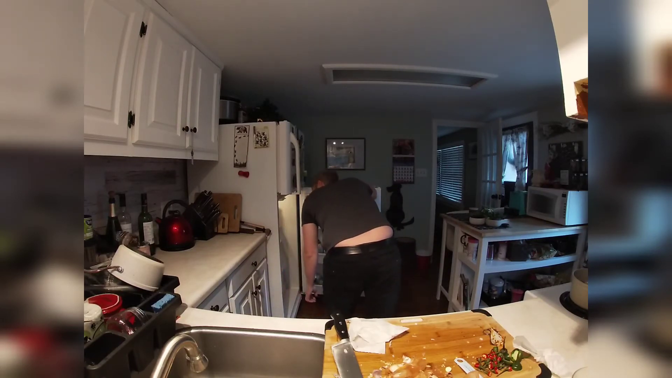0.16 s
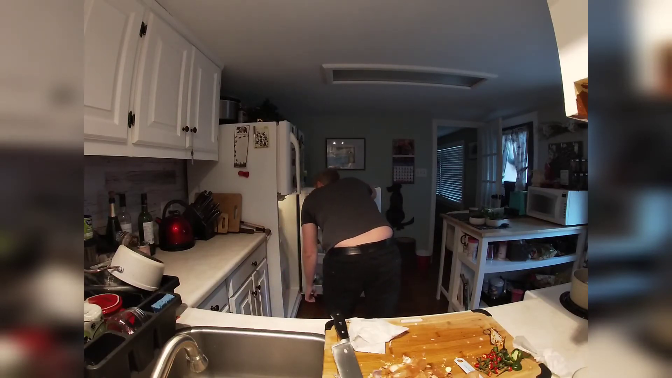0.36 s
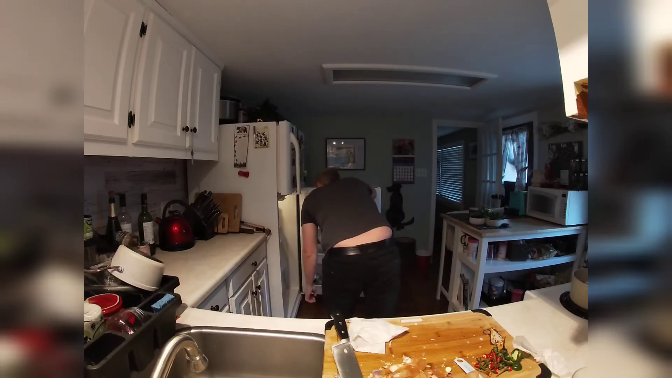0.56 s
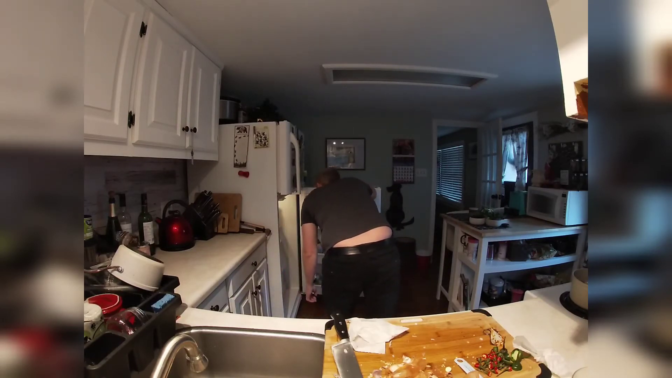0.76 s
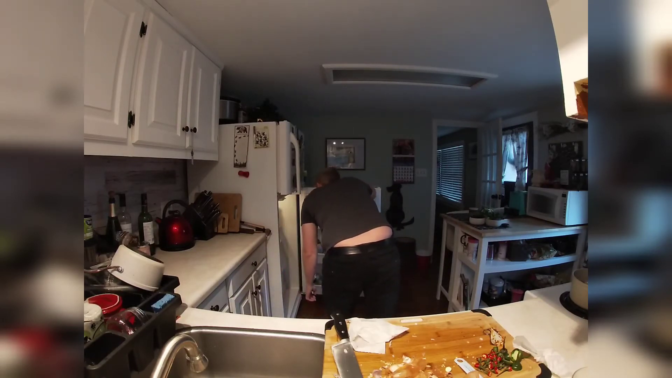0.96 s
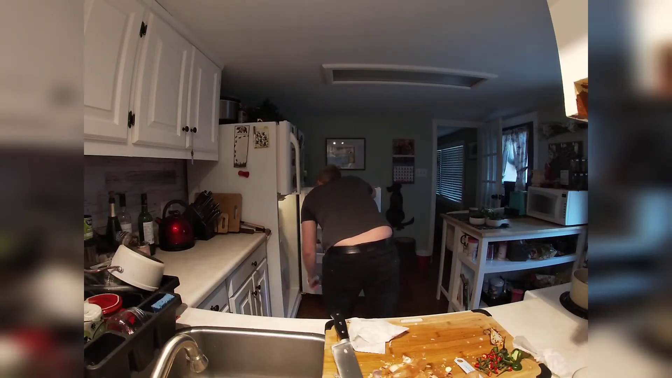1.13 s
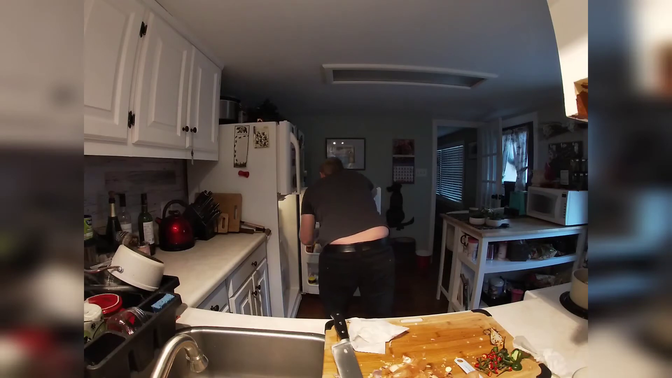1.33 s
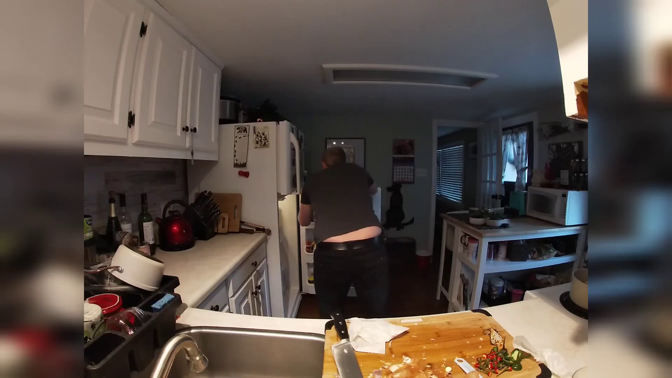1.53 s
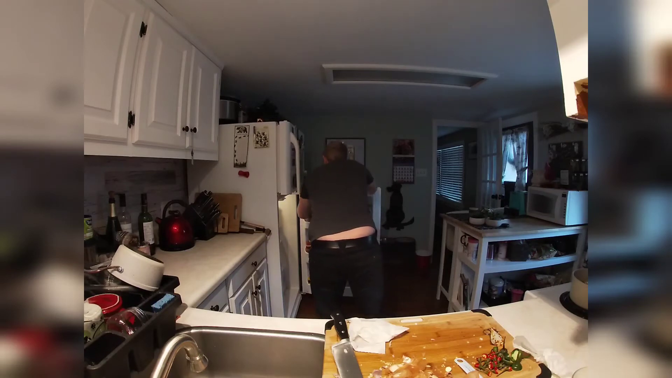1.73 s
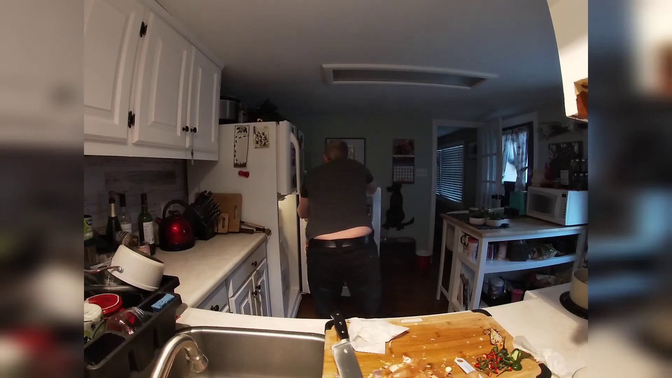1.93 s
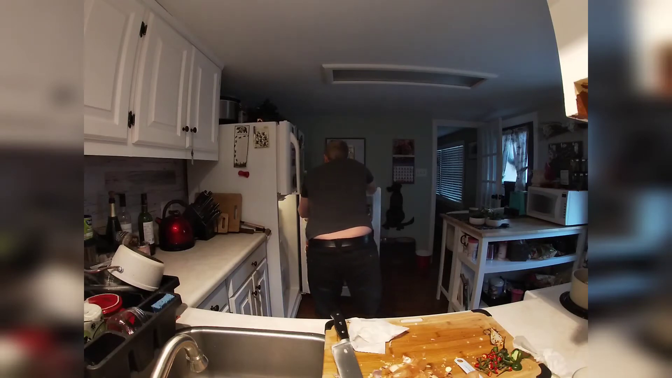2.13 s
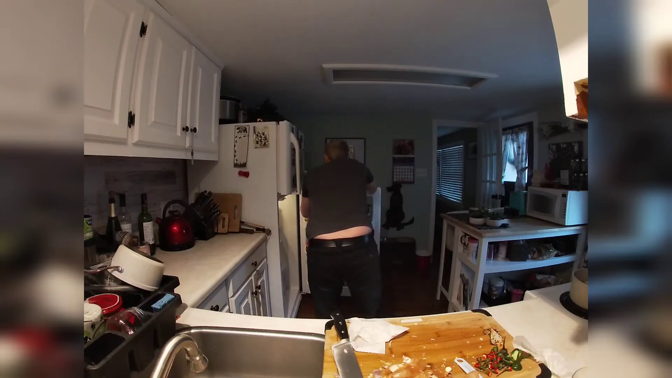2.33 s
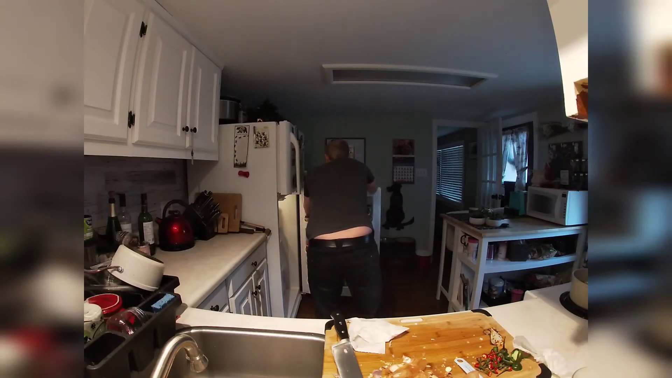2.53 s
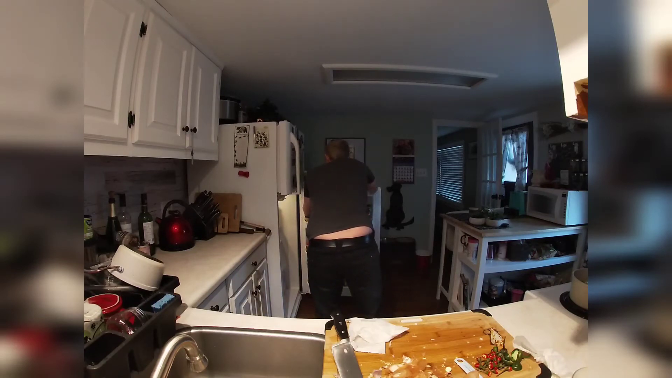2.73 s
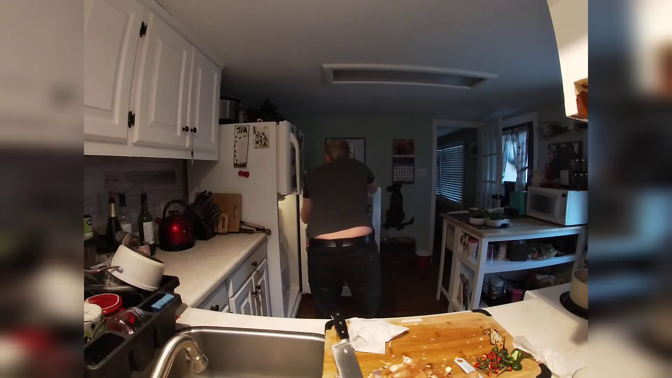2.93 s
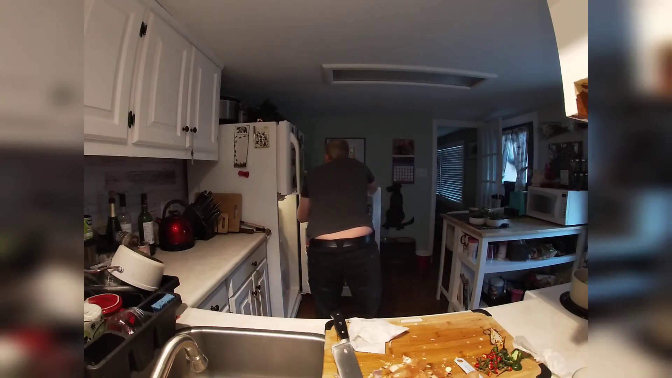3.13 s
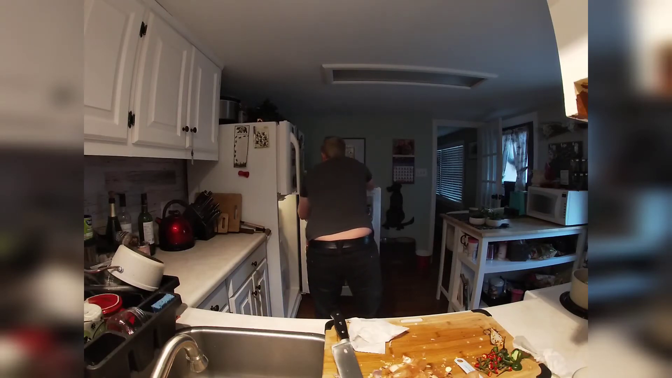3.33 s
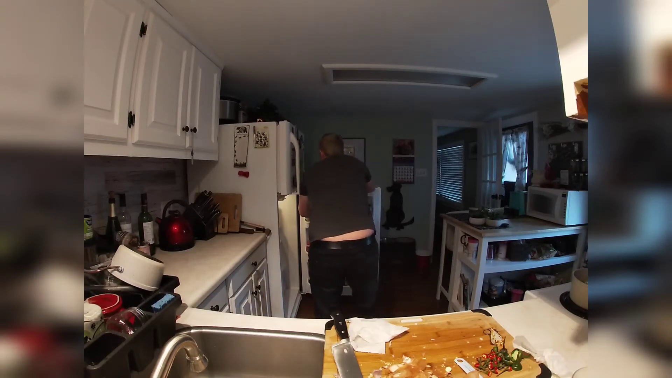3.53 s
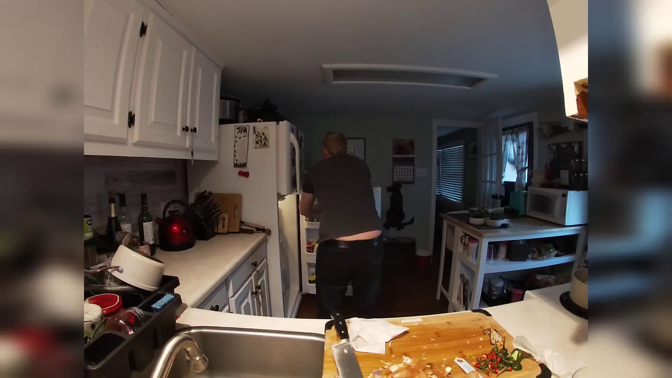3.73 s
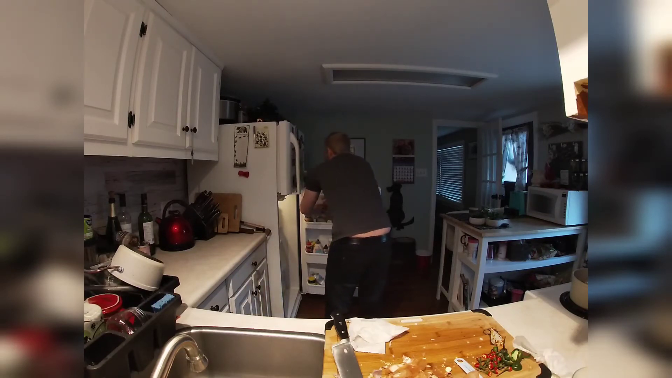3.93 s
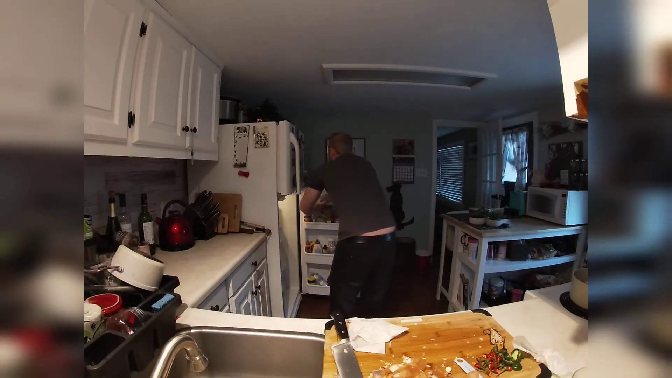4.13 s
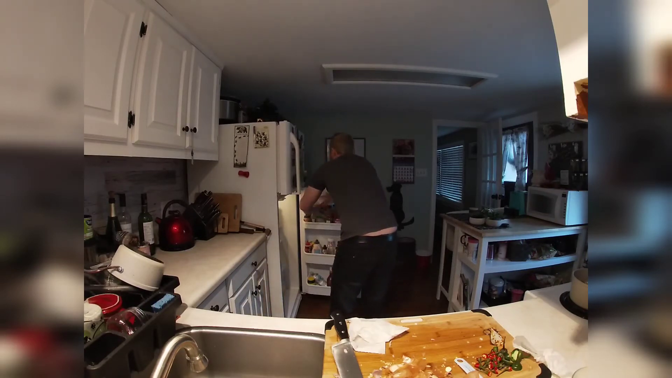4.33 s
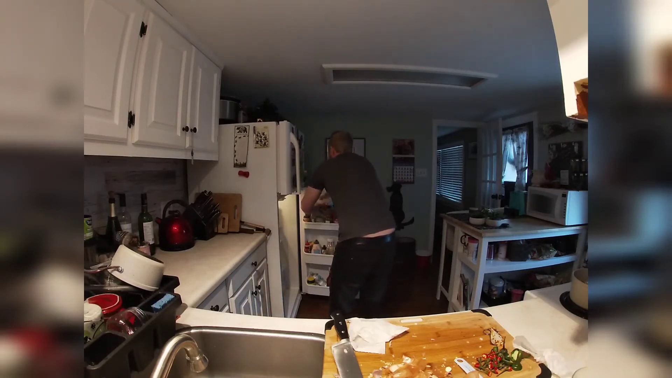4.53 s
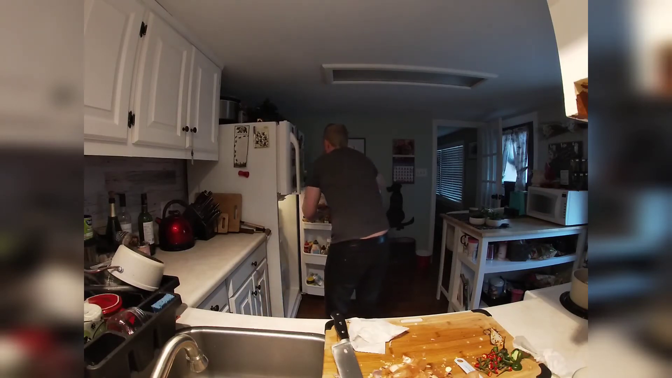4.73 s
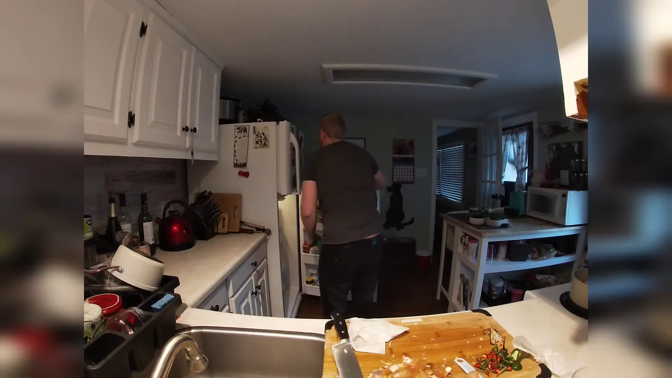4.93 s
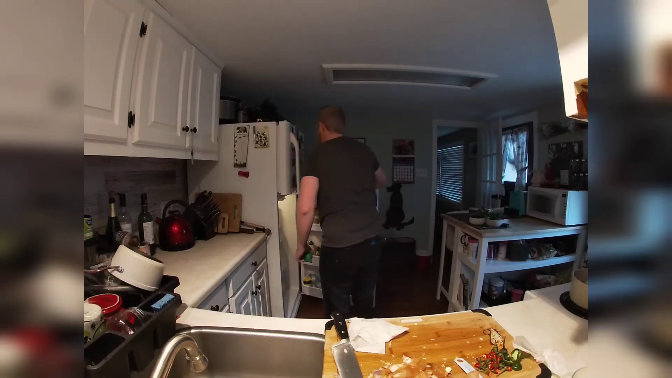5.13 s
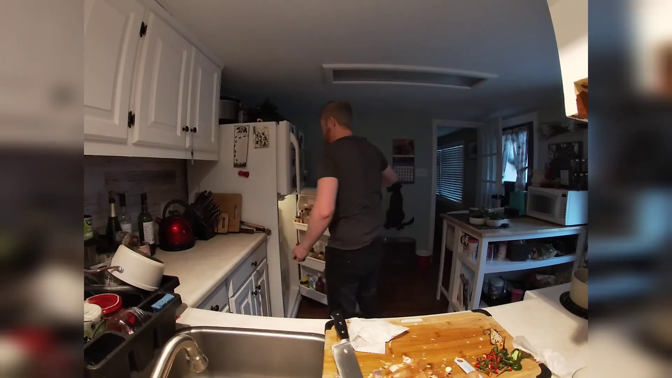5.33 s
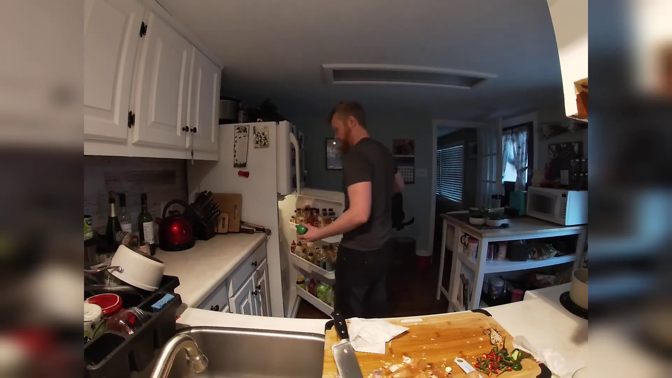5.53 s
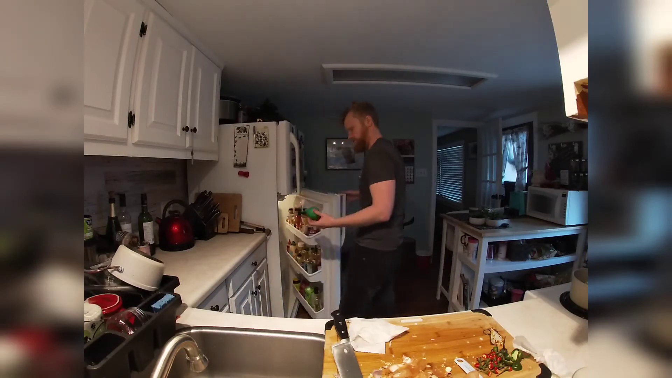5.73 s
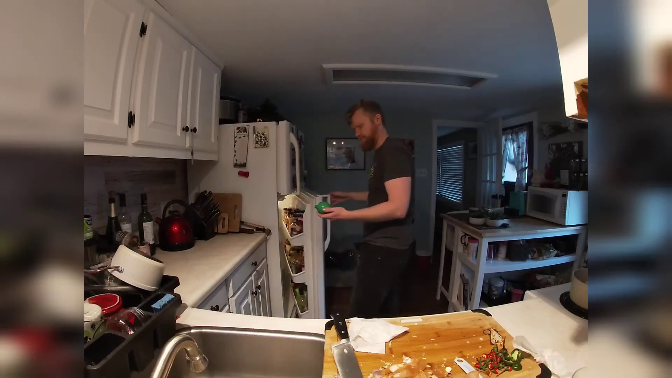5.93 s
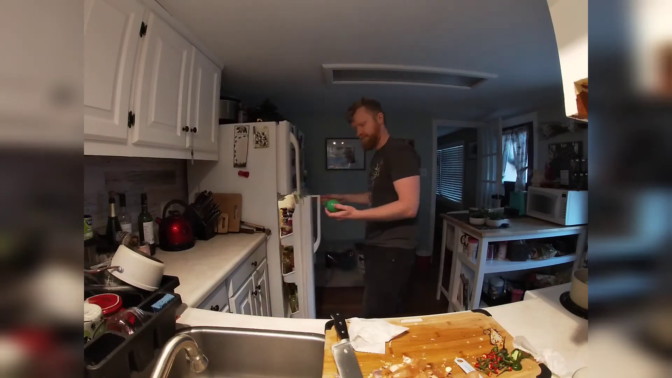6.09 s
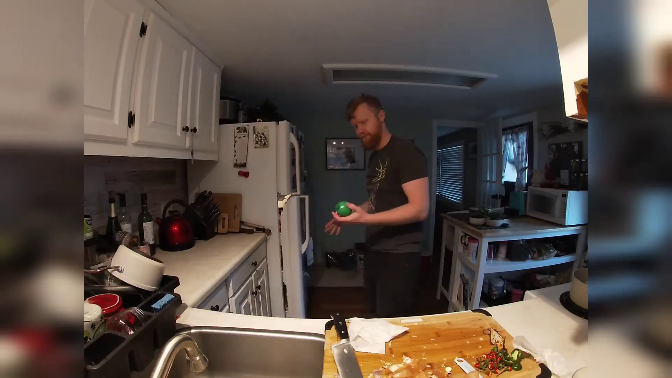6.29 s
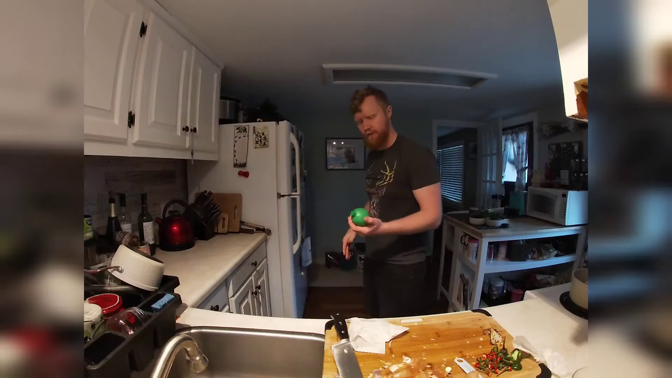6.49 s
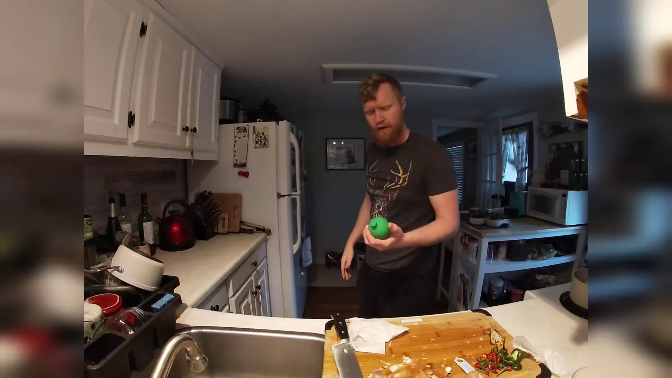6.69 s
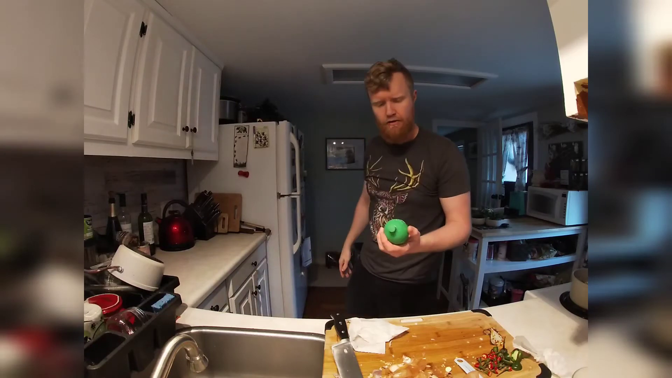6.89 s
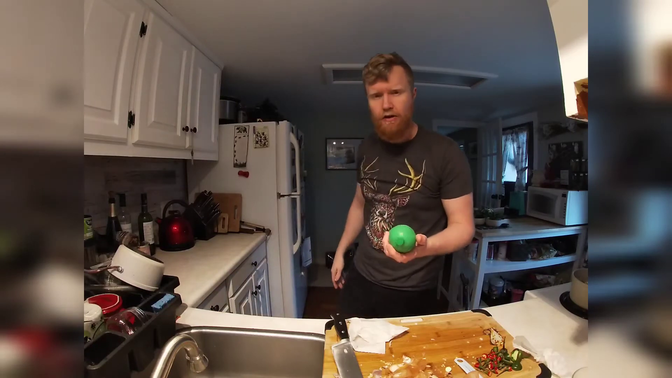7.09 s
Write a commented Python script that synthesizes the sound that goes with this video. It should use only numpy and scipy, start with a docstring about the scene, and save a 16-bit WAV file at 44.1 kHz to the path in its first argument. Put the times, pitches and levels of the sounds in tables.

```python
"""Rummaging in a refrigerator

Someone rummages in a refrigerator across a small kitchen, over the hum of its compressor.
A drawer judders open by stick and slip, packaging rustles in tiny grains, and tubs bump as hollow bursts.
Bottles and jars knock together and ring at their own modes; dull blows wake the modes of the cabinet.
Then the door thuds shut and the bottles in its racks clatter; air hisses in past the seal as shaped noise."""
import sys
import numpy as np
from scipy import signal
from scipy.fft import rfft, irfft, next_fast_len
from scipy.io import wavfile

SR = 44100
rng = np.random.default_rng(int(sys.argv[2]) if len(sys.argv) > 2 else 0)


def log_audio(samples):
    """Write samples as a 16-bit WAV file to the path given in sys.argv[1]."""
    # one column per channel
    frames = np.atleast_2d(samples).T
    # limit to full scale, then quantise
    limited = np.clip(frames, -1, 1)
    pcm = np.round(limited * 32767).astype(np.int16)
    wavfile.write(sys.argv[1], SR, pcm)


N = 315403
TIME = np.arange(N) / SR   # seconds

# Ringing modes of three glass vessels. Each row: frequency in Hz, relative level in dB, t60 in seconds.
BOTTLE = [(810, 0, 0.042), (1737, 5, 0.13), (2710, -24, 0.065), (3170, -6, 0.054), (3390, -9, 0.078),
          (3760, -11, 0.075), (4260, -14, .045), (5050, -9, 0.062), (6860, 7, 0.014), (7240, 3, .035)]
FLASK = [(896, 7, .1), (1680, -13, 0.088), (1780, 0, 0.15), (2780, -10, .09), (3067, 14, 0.055),
         (3700, -10, .08), (4560, -11, 0.068), (5400, -3, .07), (6800, 4, 0.049), (7450, 11, 0.043)]
JAR = [(1156, 0, 0.078), (1363, -5, 0.054), (1780, 20, 0.15), (2520, 12.5, .14), (3100, -2, 0.06),
       (3290, 5, 0.08), (3880, -14, 0.14), (4810, -30, 0.062), (5270, -6, .09), (6300, -20, .08),
       (6900, -18, .08)]
# Bottles and jars knocking on the shelves. Each row: start in seconds, relative level in dB,
# brightness in dB per octave, time constant of the chatter in seconds, direct sound in dB, vessel, ring in dB.
SHELF_KNOCKS = [(1.856, -58.5, -4.5, 0.0028, 4, BOTTLE, -6), (1.896, -42, -3, 0.0023, 6.5, BOTTLE, 1),
                (1.901, -39, -2, 0.0014, -4.5, BOTTLE, 3), (1.921, -51, -6, 0.0017, 5.5, BOTTLE, 9),
                (2.001, -45, -1, 0.0012, -1, BOTTLE, -3), (2.901, -50.5, 1.5, 0.0025, 1.5, JAR, -8),
                (4.403, -58.5, 2, 0.0013, 6, FLASK, -21), (4.451, -38, -4.5, 0.0028, -5.5, FLASK, -11),
                (4.457, -42, 1.1, 0.0025, 4, FLASK, -3.5), (4.636, -42, -4.5, 0.0024, -8, JAR, -15),
                (4.702, -47, -3, 0.0045, 7.5, JAR, -14), (4.712, -41.5, -2, 0.0016, 1, JAR, 0)]
# The door meets the frame, seals and rebounds. Each row: start in seconds, relative clatter level in dB,
# brightness in dB per octave, time constant of the chatter in seconds, treble cushioned by the seal in dB,
# rack resonance in Hz, its boost in dB, relative thud level in dB, thud pitch in Hz,
# relative rocking level in dB.
DOOR_IMPACTS = [(6.477, -50.5, -3.5, 0.0036, 0, 1760, 14, -53, 400, -53),
                (6.488, -35.5, -3, 0.0051, 4.5, 2430, 4, -20, 282, -30),
                (6.582, -30.5, -1, 0.0015, 3.5, 3130, 5, -23, 136, -17.5),
                (6.598, -40.5, -6.5, 0.0028, 5, 1980, -2, -47, 220, -43),
                (6.668, -42, -3.5, 0.0016, -1.5, 3480, 1, -32.5, 280, -55)]
# Colour of a knock. Each row: lower edge of the band in Hz, relative level on a shelf in dB,
# relative level in the door racks in dB.
KNOCK_BANDS = [(365, -10, -9.5), (593, -1.5, -5.5), (980, -1, -4.5), (1650, -2.5, -3), (2110, 0.5, -2),
               (3010, 3, 0.5), (4470, 1, -3), (6700, -0.5, -6), (7810, -14, -15.5)]
KNOCK_TOP_HZ, BRIGHTNESS_PIVOT_HZ = 10800, 2630
# Plastic tubs and cartons bumping. Each row: start in seconds, relative level in dB,
# brightness in dB per octave, time constant of the chatter in seconds, hollow resonance in Hz,
# its boost in dB.
TUB_BUMPS = [(2.008, -54.5, -5.5, 0.0042, 830, 12), (2.029, -59.5, -5, 0.0022, 760, 9.5),
             (2.252, -60, -2.5, 0.0033, 840, 14.5), (2.319, -53.5, -7.5, 0.0014, 2200, 2.5),
             (3.695, -54.5, -5.5, 0.0042, 1900, 5), (3.733, -62, -3.5, 0.0035, 1950, 8),
             (3.796, -64, -6, 0.0015, 1350, 5), (3.819, -62, -4, 0.0012, 800, 9),
             (3.853, -52.5, -3.5, 0.0014, 910, 6.5), (4.146, -64, -10.5, 0.0015, 1580, 6.5),
             (4.566, -54.5, -6, 0.0014, 850, -4), (4.581, -55, -1, 0.0021, 1450, 5),
             (4.654, -59, -7.5, .004, 1190, 5), (4.877, -69, -5, 0.0014, 1180, 10),
             (4.923, -68, -2, 0.0027, 1570, 12.5), (4.961, -63.5, -8, 0.0012, 845, -3),
             (4.986, -73.5, -6, 0.0033, 1490, 16), (5.114, -74, -1, 0.0018, 1150, 14)]
# Light taps and ticks. Each row: start in seconds, relative level in dB, pitch of the tap in Hz.
LIGHT_TAPS = [(1.1826, -81.5, 3970), (1.4454, -86.5, 3450), (2.733, -83, 5030), (2.866, -95, 5110),
              (3.114, -84, 7400), (3.163, -82.5, 2070), (3.421, -84.5, 3330), (3.6355, -76, 1960),
              (4.988, -85.5, 4220), (6.949, -72, 3670)]
# Dull blows to the cabinet and floor. Each row: start in seconds, relative level in dB, centre in Hz,
# t60 in seconds.
DULL_BLOWS = [(1.869, -27, 265, 0.2), (1.901, -21, 345, 0.13), (1.921, -26.5, 377, .12),
              (1.998, -29, 289, 0.33), (2.005, -39.5, 66.3, 0.3), (2.253, -40.5, 255, 0.19),
              (3.792, -31, 28.2, 0.38), (4.467, -21, 250, 0.16), (4.517, -36, 300, .2),
              (4.574, -29, 322, 0.11), (4.638, -26.5, 86, 0.12), (4.646, -21.5, 283, 0.18),
              (4.672, -32, 406, 0.19), (4.723, -26, 265, 0.07), (4.96, -46.5, 115, 0.98),
              (6.701, -11, 95.4, 0.05), (6.768, -36.5, 261, 0.11), (6.801, -30, 79, 0.066),
              (6.902, -25.5, 92, 0.057)]
# Modes of the cabinet and its shelves. Each row: frequency in Hz, relative level in dB.
CABINET_MODES = [(25, 10), (52, 2.5), (68, -6), (88, 2), (112, 3.5), (134, 3), (182, 13), (222, 0),
                 (247, 3.5), (284, -1), (322, 0), (360, -3.5), (410, 0), (455, -2), (510, -2.5), (620, -2)]
# Resonances of the drawer walls. Each row: frequency in Hz, width in Hz, relative level in dB.
DRAWER_WALLS = [(406, 37, 5), (506, 34, 5), (740, 39, 3), (855, 70, 10.5), (1135, 57, 3), (1280, 64, 7.5),
                (1405, 110, 7), (1640, 40, 4), (1738, 59, 7), (1845, 37, 7.5), (2500, 130, -3),
                (3250, 150, 2.5)]
# Hands and sleeves brushing bags and packets. Each row: height of the stroke in seconds,
# relative level in dB, time to rise and fall by 20 dB in seconds.
RUSTLE_STROKES = [(1.6, -66, 0.82), (1.88, -47, 0.25), (2.15, -49.5, 0.42), (2.88, -53, 0.12),
                  (3.47, -54.5, 0.19), (3.65, -53, 0.36), (4.02, -45.5, 0.23), (4.28, -46, 0.4),
                  (4.43, -38.5, 0.13), (4.8, -61.5, 1.9), (5.48, -63, 2.8), (6.38, -61, 1)]
# Colour of the rustle. Each row: frequency in Hz, relative level in dB per Hz.
RUSTLE_COLOUR = [(900, -1), (1800, -7), (3300, -3.5), (5500, -8), (7400, -6.5), (9000, -18.5),
                 (12500, -32.5), (15000, -40.5)]
# Jars pushed along a shelf. Each row: height of the stroke in seconds, relative level in dB,
# time to rise and fall by 20 dB in seconds.
SHOVE_STROKES = [(3.45, -46.5, 0.27), (3.66, -52, 0.26), (3.81, -41, 0.16), (4.17, -53, 0.68),
                 (4.55, -39, 0.63), (4.8, -58, .3)]
# Colour of the shoving. Each row: frequency in Hz, relative level in dB per Hz.
SHOVE_COLOUR = [(400, 14.5), (800, -6.5), (1400, -10), (2500, -20.5), (4000, -19), (10000, -47)]
# Colour of the air drawn in past the seal. Each row: frequency in Hz, relative level in dB per Hz.
SEAL_COLOUR = [(200, -10), (350, -3), (580, 6.5), (1000, -6), (2000, -10), (4000, -14), (5500, -19),
               (7500, -30), (12500, -66)]
# Lines of the compressor and fan. Each row: frequency in Hz, rms level with the door open in dB.
HUM_LINES = [(44.4, -63.5), (87.5, -64), (118.4, -62), (178.2, -44.5), (356.5, -57), (503, -67.5),
             (651, -71.5), (1237.5, -74), (1943.5, -76)]
# Colour of the fan and ducts. Each row: frequency in Hz, relative level in dB per Hz.
AIR_COLOUR = [(15, -12.5), (25, -8), (60, -15.5), (100, -22), (130, -15.5), (180, -6), (215, -6),
              (330, -8.5), (440, -20.5), (510, -12.5), (620, -22), (1050, -31.5), (1350, -29), (1700, -36),
              (2080, -37), (2700, -85)]
# Colour of the faint hiss. Each row: frequency in Hz, relative level in dB per Hz.
HISS_COLOUR = [(1500, -7.5), (2300, -2), (3700, -6.5), (5500, -4.5), (7200, -8), (8600, -18), (12300, -26),
               (15000, -41.5)]
# Decay of the kitchen's tail. Each row: frequency in Hz, t60 in seconds.
KITCHEN_T60 = [(100, 0.6), (500, 0.27), (2000, 0.37), (6000, 0.28), (14000, 0.075)]


def from_db(db):
    """Decibels to gain."""
    return 10 ** (np.asarray(db) / 20)


def rms_one(x):
    """Scale to rms 1."""
    return x / np.sqrt(np.mean(x ** 2) + 1e-20)


def unit_energy(x):
    """Scale to the energy of a unit click."""
    return x / np.sqrt(np.sum(x ** 2) + 1e-20)


def fade(t, t60):
    """Free decay, 60 dB in t60."""
    return np.exp(-np.log(1000) * t / np.maximum(t60, 1e-4))


def swell(s, rise_s, hold_s, fall_s):
    """Rises 20 dB per rise_s to reach 1 at s, holds, then falls 20 dB per fall_s."""
    before = (s - TIME) / max(rise_s, 1e-3)
    after = (TIME - s - hold_s) / max(fall_s, 1e-3)
    return from_db(-20 * np.clip(np.maximum(before, after), 0, 10))


def at_hz(points, hz):
    """Read a curve on a log-frequency axis."""
    known_hz, values = np.transpose(points)
    return np.interp(np.log(np.maximum(hz, 1)), np.log(known_hz), values)


def band(x, low_hz, high_hz, order=2):
    """Causal band-pass."""
    return signal.sosfilt(signal.butter(order, [low_hz, high_hz], "band", fs=SR, output="sos"), x)


def coloured(x, spectrum):
    """Give a steady sound a spectrum; rms 1."""
    size = next_fast_len(N)
    gain = from_db(at_hz(spectrum, np.fft.rfftfreq(size, 1 / SR)))
    return rms_one(irfft(rfft(x, size) * gain, size)[:N])


def drift(rate):
    """Slow chance with normal knots of spread 1, rate of them per second."""
    knots = rng.standard_normal(N // 100)
    return np.interp(TIME * rate, np.arange(len(knots)), knots)


def add(out, s, sound):
    """Mix a sound in at a time."""
    start = round(s * SR)
    out[start:start + len(sound)] += sound[:N - start]


def contact(chatter_s, rattle_db, rattle_t60, rattles_per_s, ring=0):
    """A contact swells and dies within milliseconds, leaves the neighbours rattling and starts any ring."""
    t = np.arange(SR // 4) / SR
    age = t / max(chatter_s, 1e-4)
    chatter = unit_energy(rng.standard_normal(len(t)) * age * np.exp(-age))
    touches = rng.standard_normal(len(t)) * (rng.random(len(t)) < rattles_per_s / SR)
    rattle = unit_energy(touches * fade(t, rattle_t60))
    return chatter + (ring + from_db(rattle_db) * rattle) * (1 - np.exp(-age))


def clink(struck, brightness, in_door, cushion_db=0, level_db=25.0):
    """A knock is coloured by where it lands, tilted by its brightness; a cushion takes the top off."""
    out = 0
    tops = [row[0] for row in KNOCK_BANDS[1:]] + [KNOCK_TOP_HZ]
    for (lo, shelf_db, door_db), hi in zip(KNOCK_BANDS, tops):
        tilt_db = brightness * np.log2(np.sqrt(lo * hi) / BRIGHTNESS_PIVOT_HZ)
        tilt_db = tilt_db - cushion_db * (lo > BRIGHTNESS_PIVOT_HZ)
        place_db = door_db if in_door else shelf_db
        out = out + from_db(level_db + tilt_db + place_db) * unit_energy(band(struck, lo, hi, order=3))
    return out


def glass(modes, detune=0.003, uneven_db=3.0):
    """A struck vessel rings at its own modes, a little differently on each blow."""
    t = np.arange(SR // 4) / SR
    hz, mode_db, t60 = np.transpose(modes)[:, :, None]
    hz = hz * np.exp(detune * rng.standard_normal(hz.shape))
    gain = from_db(mode_db + uneven_db * rng.standard_normal(hz.shape))
    return unit_energy((gain * np.sin(2 * np.pi * hz * t) * fade(t, t60)).sum(0))


def shelf_ring(count=40, t60=0.022, scatter=0.021):
    """The shelf answers a knock with many short modes."""
    t = np.arange(SR // 4) / SR
    hz = np.geomspace(650, 9500, num=count)[:, None] * np.exp(scatter * rng.standard_normal((count, 1)))
    signs = rng.choice([-1, 1], (count, 1))
    return unit_energy((signs * np.sin(2 * np.pi * hz * t)).sum(0) * fade(t, t60))


def knocks():
    """Bottles and jars touch; door and person screen some of them. Gives (into the room, direct)."""
    out, direct = np.zeros((2, N))
    for s, db, brightness, chatter_s, direct_db, vessel, ring_db in SHELF_KNOCKS:
        ring = from_db(ring_db) * glass(vessel) + shelf_ring()
        struck = contact(chatter_s, rattle_db=-4.5, rattle_t60=0.059, rattles_per_s=600, ring=ring)
        hit = from_db(db) * clink(struck, brightness, in_door=False)
        add(out, s, hit)
        add(direct, s, from_db(direct_db) * hit)
    return out, direct


def hollow(x, centre_hz, boost_db, q):
    """One broad resonance is boosted (or cut), as by a plastic wall."""
    return x + (from_db(boost_db) - 1) * signal.lfilter(*signal.iirpeak(centre_hz, q, fs=SR), x)


def bumps():
    """Tubs and cartons land with a dull, hollow scuff and no glass ring."""
    out = np.zeros(N)
    for s, db, brightness, chatter_s, hollow_hz, hollow_db in TUB_BUMPS:
        struck = contact(chatter_s, rattle_db=-4.0, rattle_t60=0.055, rattles_per_s=740)
        hit = clink(struck, brightness, in_door=False)
        add(out, s, from_db(db) * hollow(hit, hollow_hz, hollow_db, q=2.8))
    return out


def taps(level_db=52.0, t60=0.06):
    """Thin plastic gives a short, bright tick."""
    out = np.zeros(N)
    t = np.arange(SR // 8) / SR
    for s, db, hz in LIGHT_TAPS:
        tick = band(rng.standard_normal(len(t)) * fade(t, t60), hz * .5, hz * 1.8)
        add(out, s, from_db(db + level_db) * unit_energy(band(tick, 800, 7400, order=4)))
    return out


def drawer(jitter=.13, grit=0.4, top_hz=3000, flex_s=0.000437):
    """The runners stick and slip ever more slowly, shake the tray and ring its walls. Gives (judder, scrape)."""
    pull_at_s, slowing_s = 1.885, .075
    first_slips_per_s, last_slips_per_s = 310, 90
    speed = np.exp(-np.maximum(TIME - pull_at_s, 0) / slowing_s)
    rate = last_slips_per_s + (first_slips_per_s - last_slips_per_s) * speed
    cycles = np.cumsum(rate * (1 + jitter * drift(150))) / SR
    slips = np.diff(np.floor(cycles), prepend=0) * from_db(2.7 * drift(120))
    # noise flares at each slip and dies before the next
    friction = slips + grit * rng.standard_normal(N) * np.exp(-2 * (cycles % 1))
    walls = np.zeros(N)
    for hz, width_hz, db in DRAWER_WALLS:
        walls += from_db(db) * signal.lfilter(*signal.iirpeak(hz, hz / width_hz, fs=SR), friction)
    walls = np.interp(TIME + flex_s * drift(45), TIME, walls)   # the walls flex, so their resonances waver
    judder_swell = swell(pull_at_s, rise_s=0.088, hold_s=0.2, fall_s=0.054)
    judder = from_db(-33.5) * judder_swell * rms_one(band(slips, 85, 265))
    scrape_db = -37.5 + 3 * speed   # louder while the drawer is still fast
    scrape_swell = swell(pull_at_s, rise_s=0.071, hold_s=0.14, fall_s=0.07)
    scrape = from_db(scrape_db) * scrape_swell * rms_one(band(walls, 220, top_hz, order=3))
    return judder, scrape


def rubbing(strokes, colour, grains_per_s, rise_share, uneven_db, grain_db, level_db):
    """Each stroke swells and dies away: dense tiny slips of uneven size under the moving hand."""
    swells = [from_db(db) * swell(s, rise_share * length, 0, (1 - rise_share) * length)
              for s, db, length in strokes]
    effort = np.max(swells, axis=0)
    grain_size_db = uneven_db * drift(35) + grain_db * np.minimum(rng.exponential(1, N), 4)
    grains = (rng.random(N) < grains_per_s / SR) * rng.uniform(-1.12, 1, N) * from_db(grain_size_db)
    return from_db(level_db) * effort * coloured(grains, colour)


def thud(centre_hz, spread_octaves, t60, rise_s=0.00041, detune=0.025, level_db=2.0,
         shudder_db=-5, shudder_t60=0.11):
    """A blow wakes the cabinet modes near its pitch and shudders the load; panels take a moment to get going."""
    t = np.arange(SR // 2) / SR
    hz, mode_db = np.transpose(CABINET_MODES)[:, :, None]
    signs = (-1) ** np.arange(len(hz))[:, None]
    loaded_hz = hz * (1 + detune * rng.standard_normal(hz.shape))   # the load shifts each mode
    modes = signs * np.sin(2 * np.pi * loaded_hz * t)
    nearness = np.exp(-.5 * (np.log2(hz / centre_hz) / spread_octaves) ** 2)
    weights = unit_energy(from_db(mode_db) * nearness)
    boom = (weights * modes).sum(0) * fade(t, t60)
    loose = rms_one(band(rng.standard_normal(len(t)), centre_hz * 0.77, centre_hz * 1.39))
    shudder = from_db(shudder_db) * loose * fade(t, min(t60, shudder_t60))
    return from_db(level_db) * (boom + shudder) * (1 - np.exp(-t / rise_s))


def thumps(widening=0.21):
    """Heavy things bump the cabinet and the floor; the deeper the blow, the wider its spread of modes."""
    out = np.zeros(N)
    for s, db, centre_hz, t60 in DULL_BLOWS:
        spread_octaves = 0.2 * (250 / centre_hz) ** widening
        add(out, s, from_db(db) * thud(centre_hz, spread_octaves, t60))
    return out


def door():
    """Impacts rattle the racks, boom in the panels, rock the cabinet. Gives (clatter, its reflections, boom)."""
    spread_octaves = 1   # the whole door strikes, so many cabinet modes wake
    clatter, echo, boom = np.zeros((3, N))
    for (s, clatter_db, brightness, chatter_s, cushion_db,
         rack_hz, rack_db, thud_db, thud_hz, rock_db) in DOOR_IMPACTS:
        struck = contact(chatter_s, rattle_db=-13.5, rattle_t60=0.13, rattles_per_s=700)
        knock = clink(struck, brightness, in_door=True, cushion_db=cushion_db)
        hit = from_db(clatter_db) * hollow(knock, rack_hz, rack_db, q=2.7)
        add(clatter, s, hit)
        add(echo, s, from_db(1.0) * kitchen(hit, early_t60=.15, late_db=-5.5))
        add(boom, s, from_db(thud_db) * thud(thud_hz, spread_octaves, t60=0.35))
        add(boom, s, from_db(rock_db) * thud(26, spread_octaves, t60=0.41))   # rocking
    return clatter, echo, boom


def seal():
    """With the door shut, air is drawn in past the seal in a soft, steady rush."""
    rush = coloured(rng.standard_normal(N), SEAL_COLOUR)
    return from_db(-51.5) * swell(6.96, rise_s=0.01, hold_s=1, fall_s=1) * rush


def compressor(waver_db=1.5, wander=0.6, shut_db=-6.0):
    """Motor and fan lines waver in level and phase, and sink in level as the door shuts."""
    lines = np.zeros(N)
    for hz, db in HUM_LINES:
        level = from_db(db + waver_db * drift(8.4))
        lines += level * np.sin(2 * np.pi * hz * TIME + wander * drift(17))   # wander in radians
    shutting_db = np.interp(TIME, [6.5, 6.7], [0, shut_db])
    return np.sqrt(2) * lines * from_db(shutting_db)   # root 2 turns rms into peak


def fan_air():
    """Fan and ducts give a steady rush of shaped noise."""
    return from_db(-47) * coloured(rng.standard_normal(N), AIR_COLOUR)


def faint_hiss():
    """A faint, steady noise lies in the treble."""
    return from_db(-72) * coloured(rng.standard_normal(N), HISS_COLOUR)


def kitchen(x, early_t60=0.2, late_db=-6.5):
    """Reflections only: a dense spray from cupboards and floor, and a weaker tail."""
    t = np.arange(SR // 2) / SR
    edges = np.geomspace(40, 16000, 10)
    tail = np.zeros(len(t))
    for lo, hi in zip(edges, edges[1:]):
        tail += band(rng.standard_normal(len(t)), lo, hi) * fade(t, at_hz(KITCHEN_T60, np.sqrt(lo * hi)))
    early = rng.standard_normal(len(t)) * (rng.random(len(t)) < .15) * fade(t, early_t60)
    response = unit_energy(early) + from_db(late_db) * unit_energy(tail)
    response = response * (t > .001)   # nothing returns in the first millisecond
    return signal.fftconvolve(x, unit_energy(response))[:N]


def scene():
    """The refrigerator is heard across the room, above a steady rush of air and a faint hiss."""
    shelves, shelves_direct = knocks()
    tubs = bumps()
    judder, scrape = drawer()
    rustle = rubbing(RUSTLE_STROKES, RUSTLE_COLOUR, grains_per_s=920, rise_share=0.6,
                     uneven_db=2.5, grain_db=1.0, level_db=-6.5)
    shove = rubbing(SHOVE_STROKES, SHOVE_COLOUR, grains_per_s=780, rise_share=0.49,
                    uneven_db=2, grain_db=2.0, level_db=1.5)
    handling = taps() + rustle + shove
    racks, racks_echo, boom = door()
    low = thumps() + boom + judder
    direct = shelves_direct + from_db(-3.0) * tubs + from_db(-6.5) * handling
    direct = direct + from_db(2.5) * racks + from_db(1.0) * low
    # each place of contact has its own pattern of reflections
    reflected = kitchen(shelves + tubs) + racks_echo + from_db(0.6) * kitchen(handling)
    reflected = reflected + kitchen(scrape) + from_db(-4) * kitchen(low)   # the scrape is only heard reflected
    background = compressor() + fan_air() + faint_hiss()
    return (direct + reflected + seal() + background)[None]


def record(dry):
    """A steep low-pass cuts the top above 14.5 kHz."""
    return signal.sosfilt(signal.ellip(10, .1, 80, 14500, fs=SR, output="sos"), dry)


dry = scene()
out = record(dry)
log_audio(out)
```